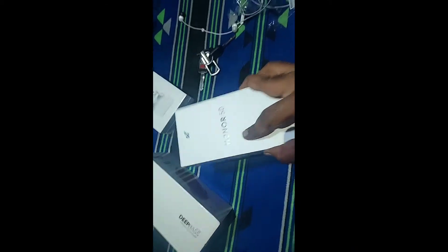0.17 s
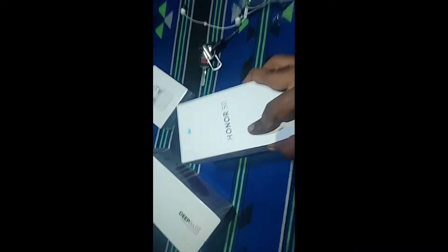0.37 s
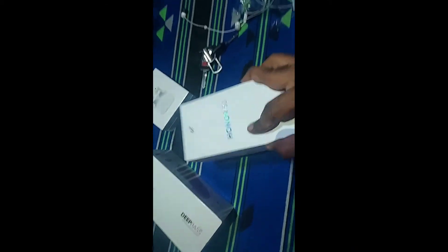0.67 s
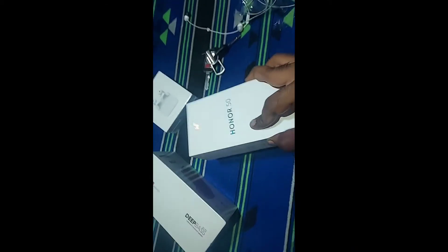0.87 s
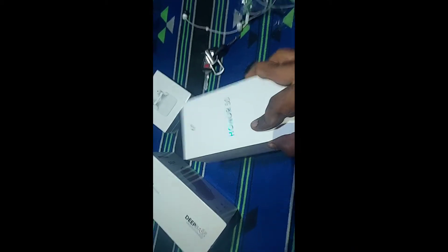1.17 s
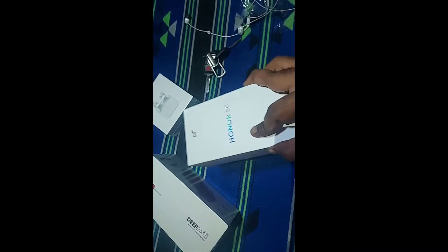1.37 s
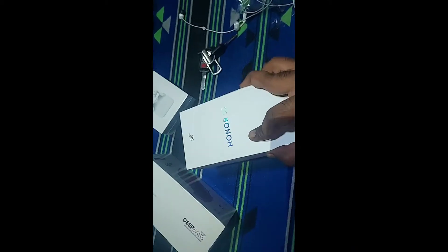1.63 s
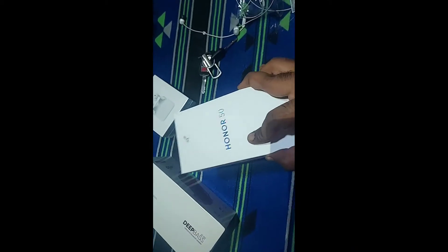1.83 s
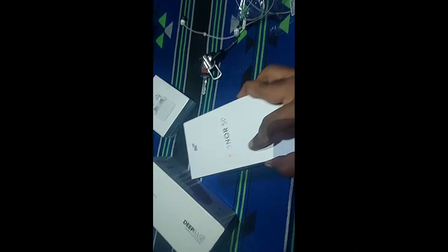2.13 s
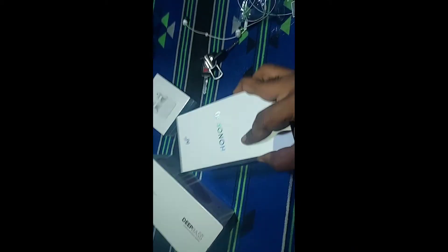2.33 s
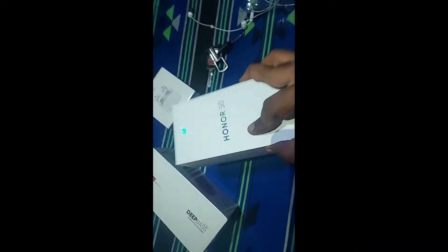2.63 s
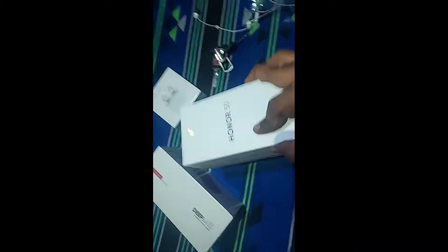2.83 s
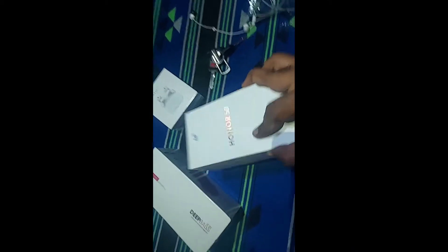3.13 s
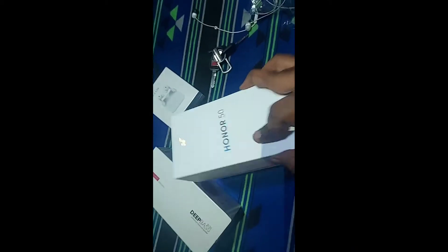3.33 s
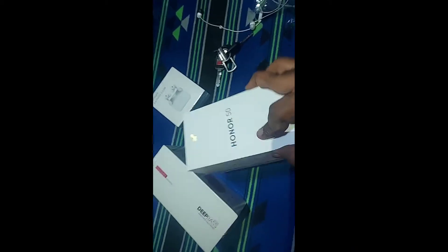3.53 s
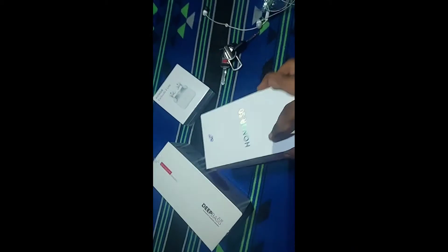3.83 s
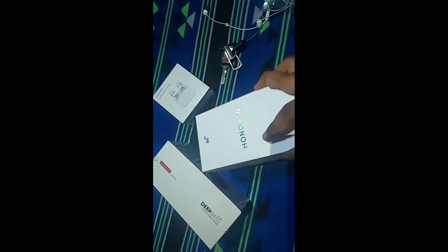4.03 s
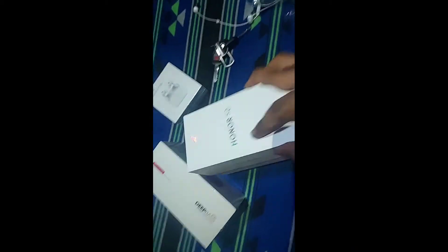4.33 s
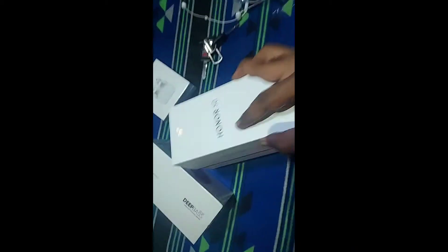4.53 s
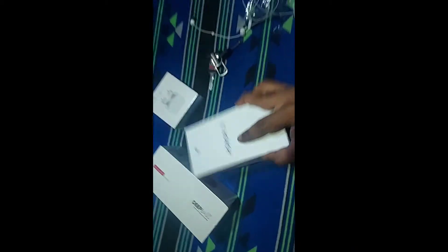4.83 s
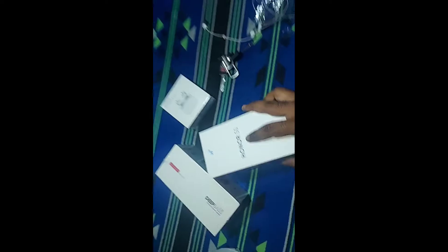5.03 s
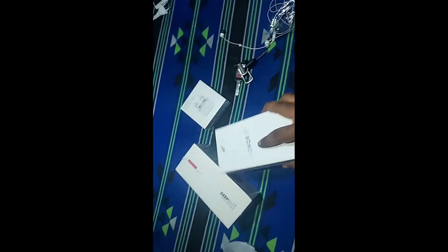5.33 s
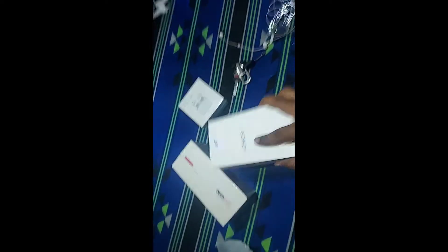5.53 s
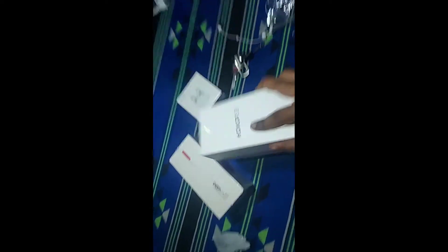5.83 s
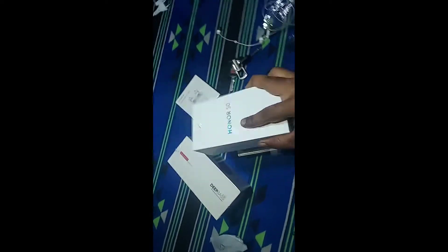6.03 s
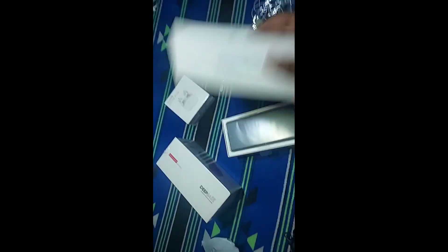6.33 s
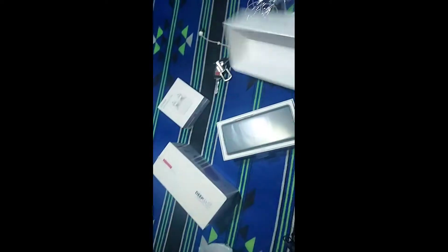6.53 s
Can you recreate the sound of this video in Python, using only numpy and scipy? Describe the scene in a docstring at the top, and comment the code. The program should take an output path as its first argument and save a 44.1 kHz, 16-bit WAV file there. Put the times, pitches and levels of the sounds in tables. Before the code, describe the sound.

A stiff cardboard box is shaken by hand, hollow knocks and light edge taps quickening over papery rasping until the lid scrapes free.

```python
"""In a quiet, soft room a hand shakes a stiff cardboard box to work its tight lid off, close to two ports.
The contents knock: short blows ring the hollow box. Edges tap: paired contacts ring small panels.
Lid and tray rasp: dense random contacts ring the same box under a grainy hiss, until the lid scrapes free.
The freed lid brushes cloth; faint hum, low rumble and airy hiss lie below."""
import sys
import numpy as np
from scipy import signal
from scipy.fft import rfft, irfft, next_fast_len
from scipy.io import wavfile

SR = 44100
rng = np.random.default_rng(int(sys.argv[2]) if len(sys.argv) > 2 else 0)


def int16_out(signal):
    """Quantize to a 16-bit WAV file."""
    q = np.round(np.clip(np.atleast_2d(signal).T, -1, 1) * 32767)
    wavfile.write(sys.argv[1], SR, q.astype(np.int16))


N = 295105

# Contents knocking on the walls. Each row: time in seconds, relative level in dB, centre of the ring in Hz.
THUMP_EVENTS = [(0.046, -23, 298), (0.095, -16, 250), (0.106, -20, 257), (0.265, -54, 328),
                (0.314, -20, 330), (0.327, -7.5, 287), (0.404, -37, 404), (0.49, -19, 305),
                (0.514, -12, 380), (0.525, -17.5, 328), (0.553, -27, 310), (0.578, -30.5, 400),
                (0.658, -9.5, 290), (0.697, -2.5, 296), (0.745, -22, 333), (0.788, -27, 423),
                (0.852, -10.5, 394), (0.905, -20, 367), (0.954, -29.5, 352), (1.009, -15.5, 396),
                (1.046, -30.5, 398), (1.129, -25.5, 437), (1.172, -29.5, 406), (1.241, -23.5, 432),
                (1.283, -20.5, 410), (1.328, -24, 318), (1.353, -21, 328), (1.379, -12, 360),
                (1.404, -21, 390), (1.444, -31.5, 358), (1.525, -27, 430), (1.635, -25.5, 436),
                (1.708, -26, 414), (1.782, -36.5, 380), (2.095, -31.5, 390), (2.223, -42, 340),
                (2.322, -27.5, 380), (2.344, -22, 310), (2.414, -1, 312), (2.491, -25.5, 366),
                (2.606, -9.5, 313), (2.649, -32, 410), (2.674, -20, 397), (2.797, -6, 443),
                (2.838, -18.5, 330), (2.856, -28.5, 360), (2.932, -14.5, 470), (2.981, 2, 402),
                (3.039, -16.5, 362), (3.071, -13, 414), (3.122, -23.5, 380), (3.143, -15, 380),
                (3.155, -3.5, 392), (3.227, -22.5, 380), (3.253, -15.5, 350), (3.283, -18, 390),
                (3.343, -10, 368), (3.393, -22, 366), (3.409, -22, 385), (3.431, -16.5, 423),
                (3.497, -4, 384), (3.569, -25.5, 380), (3.596, -16, 350), (3.604, -15.5, 410),
                (3.686, -9, 374), (3.757, -24.5, 400), (3.838, -23, 434), (3.856, -27, 363),
                (3.884, -17.5, 388), (3.893, -13.5, 407), (3.966, -21.5, 390), (4.066, -20.5, 380),
                (4.096, -1.5, 380), (4.153, -24, 380), (4.176, -12, 440), (4.195, -35, 350),
                (4.204, -17, 450), (4.265, -17.5, 390), (4.278, 2, 410), (4.293, -11.5, 330),
                (4.392, -14, 420), (4.477, -6, 440), (4.555, -27, 382), (4.611, -17, 408),
                (4.688, -10.5, 344), (4.762, -26.5, 380), (4.818, -17, 409), (4.901, -25, 345),
                (4.913, -13, 400), (4.943, -16, 343), (4.984, -28, 320), (5.478, -32.5, 370),
                (5.498, -33.5, 383), (5.572, -15, 450), (5.644, -26, 380), (5.688, -14, 460),
                (5.758, -1, 416), (5.763, -1.5, 448), (5.772, -8.5, 308), (5.786, -11, 375),
                (5.803, -10.5, 417), (5.828, -37.5, 390), (5.862, -17, 398), (5.873, -5.5, 322.5),
                (5.943, -11, 400), (5.952, -1.5, 390), (5.962, -25, 380), (6.003, -22, 390),
                (6.021, -1.5, 410), (6.046, -26, 452), (6.052, 0.5, 430), (6.061, -3, 470),
                (6.12, -10.5, 365), (6.14, -13, 390), (6.169, -24, 278)]
# Edges tapping and slipping. Each row: time in seconds, relative ring level in dB, centre of the ring in Hz,
# relative level of the papery puff in dB.
TAP_EVENTS = [(0.046, -28.5, 1900, -47), (0.106, -37, 1250, -59.5), (0.264, -58, 1700, -91),
              (0.306, -34.5, 1490, -83), (0.313, -36, 1015, -56), (0.328, -33, 960, -52),
              (0.404, -41.5, 1590, -83), (0.491, -29, 1460, -52.5), (0.513, -35, 970, -57),
              (0.548, -35, 900, -59), (0.58, -37, 1560, -79), (0.659, -19, 1800, -37.5),
              (0.695, -20, 950, -40), (0.733, -27.5, 1120, -53.5), (0.747, -35, 1235, -73.5),
              (0.77, -47, 1890, -71), (0.79, -35, 1560, -78), (0.851, -25, 935, -49.5),
              (0.899, -31, 1010, -56), (0.906, -35, 1250, -69), (1.007, -21, 940, -46),
              (1.045, -41, 1290, -71), (1.131, -30, 980, -54), (1.172, -42.5, 1240, -76),
              (1.243, -29, 1100, -56), (1.284, -36.5, 1300, -53), (1.327, -32, 1690, -49.5),
              (1.356, -37, 1256, -53), (1.382, -18, 935, -44.5), (1.431, -50, 2000, -65),
              (1.527, -44, 1750, -68), (1.636, -45, 1060, -68), (1.708, -34, 1110, -58),
              (1.783, -51, 1240, -97), (1.831, -72, 1540, -66), (2.094, -45.5, 1240, -75),
              (2.145, -56.5, 1490, -87), (2.226, -56, 1500, -80), (2.324, -41, 1280, -76),
              (2.413, -22, 1140, -45.5), (2.491, -36, 1190, -76), (2.601, -26.5, 1000, -52),
              (2.628, -41, 1170, -69), (2.676, -28.5, 1220, -68), (2.759, -30, 1180, -47.5),
              (2.784, -35, 1180, -61), (2.8, -17, 1050, -49), (2.856, -28.5, 1245, -68),
              (2.919, -39, 1270, -56.5), (2.932, -27.5, 1513, -49.5), (2.944, -43.5, 1364, -50.5),
              (2.979, -16.5, 1127, -44.5), (3.024, -47.5, 1114, -55), (3.041, -30, 1208, -58),
              (3.074, -16.5, 1530, -36), (3.122, -28, 1150, -45.5), (3.153, -14, 1060, -44),
              (3.166, -52, 1260, -55), (3.216, -37, 1030, -71), (3.255, -33, 1260, -52),
              (3.284, -30, 1220, -61), (3.344, -16, 1120, -45), (3.393, -28.5, 1223, -71),
              (3.411, -43.5, 1554, -60.5), (3.432, -24, 1542, -45), (3.498, -19.5, 1283, -52),
              (3.509, -30.5, 1250, -44.5), (3.57, -33, 1230, -55), (3.595, -35, 1520, -44),
              (3.606, -15.5, 1240, -60), (3.673, -33, 1370, -52), (3.688, -19, 1260, -41),
              (3.708, -17, 1100, -43.5), (3.756, -40, 1110, -74), (3.789, -43.5, 1780, -64),
              (3.837, -36, 1210, -57), (3.854, -27.5, 1000, -48), (3.879, -35, 980, -68),
              (3.886, -28, 1210, -47), (3.895, -20.5, 1290, -56), (3.967, -31.5, 1200, -68),
              (4.065, -35, 1460, -67.5), (4.088, -29, 1248, -42), (4.097, -17, 1370, -47.5),
              (4.155, -29.5, 1270, -68.5), (4.175, -39, 1280, -55.5), (4.203, -22.5, 1520, -46.5),
              (4.241, -24, 1271, -42.5), (4.249, -39, 1177, -54), (4.275, -20.5, 1328, -42.5),
              (4.294, -19, 1423, -40), (4.346, -36, 1072, -49), (4.382, -38, 1710, -48.5),
              (4.394, -20, 1600, -54), (4.479, -18.5, 1293, -47.5), (4.496, -28.5, 1110, -55),
              (4.553, -41.5, 1570, -66), (4.613, -33.5, 1570, -70), (4.679, -35.5, 1187, -69),
              (4.689, -25.5, 1560, -50), (4.763, -32.5, 1550, -77), (4.792, -53, 2240, -64),
              (4.82, -29, 1650, -59), (4.914, -26.5, 1240, -64), (4.93, -47, 1050, -68),
              (4.942, -33, 1530, -44.5), (5.06, -73, 1900, -65), (5.479, -54.5, 1420, -77),
              (5.498, -51, 1010, -89), (5.572, -27.5, 1520, -49.5), (5.646, -35.5, 1510, -69),
              (5.671, -44.5, 1910, -79), (5.689, -25, 1117, -51.5), (5.726, -40, 1632, -58.5),
              (5.759, -19.5, 1355, -37), (5.776, -17.5, 1613, -41), (5.792, -26, 1245, -42),
              (5.804, -24, 1140, -41), (5.862, -28, 1300, -48.5), (5.871, -19.5, 1396, -36),
              (5.944, -24, 1093, -39.5), (5.957, -13.5, 1004, -48), (5.966, -20, 1202, -58.5),
              (6.0, -38.5, 1100, -51), (6.02, -13.5, 1135, -22), (6.046, -20, 1542, -30),
              (6.052, -19, 1700, -20.5), (6.063, -16, 1670, -32.5), (6.076, -31.5, 1700, -45.5),
              (6.125, -20, 1700, -28.5), (6.14, -27.5, 1893, -28), (6.151, -52, 1800, -49),
              (6.585, -60.5, 1101, -62.5)]
# Lid rubbing on tray. Each row: time in seconds, relative rub on the box in dB, relative papery hiss in dB.
RUB_CURVE = [(0.0, -55, -74), (0.32, -59.5, -79), (0.73, -46, -66), (1.38, -55, -73.5), (2.1, -71.5, -81),
             (2.61, -44, -65), (2.98, -40, -58), (3.24, -44, -63), (3.91, -50.5, -67), (4.21, -41, -59),
             (4.9, -57, -69.5), (5.09, -76, -76.5), (5.52, -62.5, -75), (5.72, -42, -63.5),
             (5.92, -39.5, -60.5), (6.02, -36, -65.5), (6.24, -92.5, -81), (6.69, -84, -78)]
# Air and walls of the box. Each row: frequency in Hz, relative level in dB, t60 in seconds, left over right in dB.
HOLLOW_MODES = [(170.6, 8.5, 0.14, 6.5), (247.8, 15, 0.041, -2), (296.6, -3.5, 0.062, 1.5),
                (369.6, 4.5, 0.013, -0.5), (453.3, 3.5, 0.02, -1), (533, -1, 0.032, 5),
                (674, 8.5, 0.03, -2.5), (730, 8, 0.011, 0)]
# Small panels and edges. Each row: frequency in Hz, relative level in dB, t60 in seconds, left over right in dB.
PANEL_MODES = [(835, 9, 0.014, 8.5), (1022, 4.5, 0.014, -1.5), (1198, 8, 0.017, -1.5),
               (1633, 2, 0.021, -10.5), (1758, 0.5, 0.027, -9.5), (1910, -1.5, 0.032, -2),
               (2400, -17, 0.023, -1), (2660, -23, 0.036, -3), (3427, -30.5, 0.021, 6.5),
               (4730, -25, 0.017, -12.5)]


def from_db(db):
    """Decibels to gain."""
    return 10 ** (np.asarray(db) / 20)


def rms_one(x):
    """Scale to rms 1."""
    return x / np.sqrt(np.mean(x ** 2) + 1e-20)


def in_time(rows):
    """Columns of a curve table, interpolated to one value a sample."""
    s, *columns = np.transpose(rows)
    return [np.interp(np.arange(N) / SR, s, c) for c in columns]


def smooth(x, hz):
    """Double one-pole low-pass."""
    r = np.exp(-2 * np.pi * hz / SR)
    return signal.lfilter([(1 - r) ** 2], [1, -2 * r, r * r], x + 1e-18)


def drift(hz):
    """Low-passed noise of rms 1; the first second, where the filter settles, is dropped."""
    return rms_one(smooth(rng.standard_normal(N + SR), hz)[SR:])


def sides(db):
    """Left and right gains for a left-over-right level step."""
    return from_db(np.array([db, -np.asarray(db)]) / 2)


def around(s, db, early_s, long_s):
    """A smooth bump of the given height for each event, starting a little before it."""
    marks = np.zeros(N)
    starts = np.maximum(np.round((s - early_s) * SR).astype(int), 0)
    np.add.at(marks, starts, from_db(db))
    return signal.oaconvolve(marks, np.hanning(round(long_s * SR)))[:N]


def coloured(spectrum, alike, grain_db=0.):
    """Stereo noise, rms 1: alike is the share common to both ports, grain makes that share crackle."""
    hz, db = np.transpose(spectrum)
    grid_hz = np.maximum(np.arange(N // 2 + 1) * SR / N, 1)
    mid, side = rng.standard_normal((2, N))
    mid = rms_one(mid * from_db(grain_db * drift(hz=905)))
    share = np.clip(alike, 0, 1)
    pair = np.sqrt(1 + share) * mid + np.sqrt(1 - share) * side * [[1], [-1]]
    shape = from_db(np.interp(np.log(grid_hz), np.log(hz), db))
    return rms_one(irfft(rfft(pair) * shape, N))


def ring(clicks, hz, t60):
    """Damped resonance: a unit click sets a sine of starting height 1 ringing."""
    r, w = from_db(-60 / (t60 * SR)), 2 * np.pi * hz / SR
    return signal.lfilter([0, np.sin(w)], [1, -2 * r * np.cos(w), r * r], clicks + 1e-18)


def strike(modes, at, gains, centre_hz, focus_db, spread_db, apart_db):
    """Each contact favours modes near its centre, varied by chance and not quite alike at both ports."""
    hz, level_db, t60, side_db = np.transpose(modes)
    chance = rng.standard_normal((len(at), len(modes), 2))
    octaves = np.log2(hz / np.reshape(centre_hz, (-1, 1)))
    share = from_db(level_db - focus_db * octaves ** 2 + spread_db * chance[..., 0])
    share = share / np.linalg.norm(share, axis=1, keepdims=True)
    out = np.zeros((2, N))
    for k in range(len(modes)):
        clicks = np.zeros((2, N))
        port_gains = sides(side_db[k] + apart_db * chance[:, k, 1])
        np.add.at(clicks, (slice(None), at), gains * share[:, k] * port_gains)
        out += ring(clicks, hz[k], t60[k])
    return out


def through_air(x, hz, t60):
    """Enclosed air: a wide resonance, twice, that swells gradually and radiates no steady push."""
    moving = np.diff(x, prepend=0) * SR / (2 * np.pi * hz)
    return ring(ring(moving, hz, t60), hz, t60) * (2 * np.log(1000) / (t60 * SR)) ** 2


def air():
    """Patchy room hiss with a faint airy tone: noise through a narrow resonance."""
    # Hiss spectrum. Each row: frequency in Hz, relative density in dB per Hz.
    hiss_spectrum = [(71, -35), (120, 8.5), (378, -4.5), (1050, -22), (1750, -20), (3310, -44),
                     (7200, -14.5), (7980, -17), (10600, -19.5), (16000, -17)]
    # Airy tone. Frequency in Hz, width in Hz, base level in dB.
    whine = (1790, 82, -82.5)
    # Change of the tone, lower towards the end. Each row: time in seconds, added level in dB.
    whine_fade = [(0, 3), (5.4, -3.5), (6.2, -15.5), (6.69, -10)]
    hz, width_hz, db = whine
    band = rms_one(ring(rng.standard_normal((2, N)), hz, np.log(1000) / (np.pi * width_hz)))
    hiss = from_db(-75 + 2.0 * drift(hz=8)) * coloured(hiss_spectrum, alike=0.41)
    band_db = db + in_time(whine_fade)[0] + 2.5 * drift(hz=4)
    return hiss + from_db(band_db) * band


def hum():
    """Two low sine lines with slightly wandering phase, swelling and fading together."""
    # Hum lines. Each row: frequency in Hz, relative level in dB.
    lines = [(102, 1.5), (51.5, -4)]
    # Swell of the hum. Each row: time in seconds, level in dB.
    level = [(0.0, -59.5), (.8, -56), (1.2, -69), (2.3, -78), (2.9, -64), (4.3, -45.5), (4.9, -54.5),
             (5.4, -59), (6.1, -57), (6.3, -74), (6.69, -71)]
    t = np.arange(N) / SR
    tone = sum(from_db(db) * np.sin(2 * np.pi * (hz * t + 0.1 * drift(hz=1))) for hz, db in lines)
    return from_db(in_time(level)[0]) * tone


def sway():
    """Lumpy low rumble as the box swings: noise that follows the rub, the thumps and the jolts."""
    # Bumps of the hand or box. Each row: time in seconds, level in dB.
    jolts = [(.8, -49), (1.399, -64), (4.95, -48), (5.08, -50), (6.68, -55)]
    thump_s, thump_db, _ = np.transpose(THUMP_EVENTS)
    jolt_s, jolt_db = np.transpose(jolts)
    swing = from_db(-62.0 + 0.72 * (in_time(RUB_CURVE)[0] + 49.5))
    swing = swing + around(thump_s, -44.0 + 0.63 * thump_db, early_s=0.035, long_s=.16)
    swing = swing + around(jolt_s, jolt_db, early_s=0.082, long_s=.2)
    # Each row: frequency in Hz, relative density in dB per Hz.
    spectrum = [(15, 5.5), (35, -16.5), (55, -17.5), (85, -0.5), (140, -23.0), (300, -55.0)]
    return swing * coloured(spectrum, alike=0.99)


def rustle():
    """The freed lid brushing past cloth: thin, bright, patchy noise."""
    # Swell of the brush. Each row: time in seconds, level in dB.
    level = [(6.3, -120), (6.52, -100), (6.55, -63), (6.62, -67), (6.69, -68)]
    # Cloth spectrum. Each row: frequency in Hz, relative density in dB per Hz.
    cloth = [(880, -44), (1500, -24.5), (2910, -7.5), (3350, -17), (4870, -7), (11800, -4), (16000, -10.5)]
    patchy_db = in_time(level)[0] + 2.0 * drift(hz=30.06)
    return from_db(patchy_db) * coloured(cloth, alike=0.18, grain_db=0.5)


def room(x):
    """Six feedback delays a side, duller on every round as the walls absorb treble."""
    t60_s, wall_cut_hz = 0.22, 4300
    size = next_fast_len(N + SR)
    w = 2 * np.pi * np.arange(size // 2 + 1) / size
    dull = 1 / (1 + 1j * w * SR / (2 * np.pi * wall_cut_hz))
    out = np.zeros((2, len(w)), complex)
    for k, lag_s in enumerate(rng.uniform(0.0073, 0.022, 12)):
        loop = from_db(-60 * lag_s / t60_s) * dull * np.exp(-1j * w * lag_s * SR)
        out[k % 2] += (-1) ** (k // 2) * loop / (1 - loop)
    return irfft(out * rfft(x, size), size)[:, :N]


def scrapes():
    """Long scrapes of lid along tray: smooth swells for the rumble and the hiss."""
    # Each row: start in seconds, length in seconds, relative rumble in dB, relative hiss in dB.
    strokes = [(2.746, .1, -37, -58), (3.143, 0.14, -48, -75), (4.226, 0.11, -30.5, -60),
               (4.879, 0.12, -39, -67), (4.951, 0.15, -54.5, -78), (5.702, .1, -32, -61),
               (5.909, 0.11, -29, -53), (5.971, 0.14, -39, -43.5), (6.103, 0.16, -59.5, -64.5)]
    out = np.zeros((2, N))
    for s, length_s, *levels_db in strokes:
        bump = np.hanning(round(length_s * SR))
        start = round(s * SR)
        out[:, start:start + len(bump)] += from_db(levels_db)[:, None] * bump
    return out


def rub(per_s):
    """Fibres catch and slip: dense uneven contacts into the box and a grainy hiss, swelling around each blow."""
    # Papery hiss spectrum. Each row: frequency in Hz, relative density in dB per Hz.
    paper_spectrum = [(1470, -16.5), (2500, -13), (3060, -20.5), (3490, -20), (5070, -20), (6150, -27),
                      (9730, -27), (14700, -31), (15500, -27), (16000, -41)]
    # Hiss above 7 kHz, brighter as the lid works loose. Each row: time in seconds, treble change in dB.
    brightness = [(0.0, -21), (1.6, -16), (2.4, 1.5), (4.8, -2), (5.1, 4.5), (5.9, -2), (6.05, 3.5),
                  (6.69, 1)]
    rub_db, hiss_db = in_time(RUB_CURVE)
    bright_db, = in_time(brightness)
    scrape, scrape_hiss = scrapes()
    thump_s, thump_db, _ = np.transpose(THUMP_EVENTS)
    tap_s, tap_db, _, puff_db = np.transpose(TAP_EVENTS)

    # the lid slides around each thump and moves less between
    strokes = around(thump_s, 0 * thump_db, early_s=.025, long_s=0.064)
    sliding = np.minimum(from_db(-5.5) + strokes, 1.5)
    rubbing = from_db(rub_db) * sliding + scrape
    rumble = from_db(-0.5) * rubbing + around(thump_s, thump_db - 26, early_s=.014, long_s=.044)
    steady_rasp = from_db(-41.5) * (rubbing / from_db(-27.5)) ** 0.93
    rasp = steady_rasp + around(tap_s, tap_db - 22, early_s=.003, long_s=0.022)
    snaps = around(tap_s, puff_db - 2.5, early_s=0.00033, long_s=0.0058)
    puffs = around(tap_s, puff_db - 11, early_s=0.01, long_s=0.033)
    hiss = from_db(hiss_db) * sliding + scrape_hiss + snaps + puffs

    at = np.flatnonzero(rng.random(N) < per_s * from_db(3.0 * drift(hz=25)) / SR)
    sizes = from_db(4 * np.minimum(rng.exponential(1, len(at)), 3))
    sizes = sizes * rng.choice([-1, 1], len(at))
    hollow = strike(HOLLOW_MODES, at, sizes, centre_hz=393.3, focus_db=4.5, spread_db=8.0, apart_db=-3.0)
    hollow = rms_one(through_air(hollow, hz=398, t60=0.011))
    panels = rms_one(strike(PANEL_MODES, at, sizes, centre_hz=1500, focus_db=8, spread_db=7, apart_db=7))

    paper = coloured(paper_spectrum, alike=.35, grain_db=4)
    top = signal.sosfilt(signal.butter(2, 7000, "high", fs=SR, output="sos"), paper)
    paper = paper + (from_db(bright_db) - 1) * top
    paper = from_db(2.0 * drift(hz=59.6)) * paper * sides(-0.83)[:, None]
    return rumble * hollow + rasp * panels + hiss * paper


def taps():
    """Edges tap and slip: each tap is a ragged pair of contacts ringing the panels."""
    s, level_db, centre_hz, _ = np.transpose(TAP_EVENTS)
    at = np.round(s * SR).astype(int)
    chance = rng.random((len(s), 3))
    first = np.sign(chance[:, 0] - .5) * from_db(level_db - 1.5)
    second = .7 * first * np.sign(chance[:, 2] - .5)
    late = at + (0.0025 * SR * chance[:, 1]).astype(int)   # up to 2.5 ms later
    rings = strike(PANEL_MODES, np.r_[at, late], np.r_[first, second], np.r_[centre_hz, centre_hz],
                   focus_db=20, spread_db=6.5, apart_db=3)
    return smooth(rings, hz=4300)


def thumps():
    """Contents blow softly into the hollow: walls ring through the enclosed air and the whole box swings."""
    # Swing of the whole box. Frequency in Hz, relative level in dB, t60 in seconds.
    belly = (116, -21, 0.086)
    s, level_db, centre_hz = np.transpose(THUMP_EVENTS)
    at = np.round(s * SR).astype(int)
    gains = rng.choice([-1, 1], len(s)) * from_db(level_db)
    walls = strike(HOLLOW_MODES, at, 1.3 * gains, centre_hz, focus_db=20.0, spread_db=2, apart_db=1)
    hz, db, t60 = belly
    pushes = np.zeros(N)
    np.add.at(pushes, at, gains)
    whole_box = from_db(db) * ring(smooth(pushes, hz=224), hz, t60)
    return through_air(walls, hz=422.3, t60=0.011) + whole_box


def scene():
    """Box, room and background; the direct box sound reaches the right port one sample later."""
    port_lag_s, room_db = 1 / SR, -26
    box = thumps() + taps() + rub(per_s=350)
    left, right = box
    right = np.interp(np.arange(N) - port_lag_s * SR, np.arange(N), right)
    background = hum() + sway() + rustle() + air()
    return np.array([left, right]) + from_db(room_db) * room(box.mean(axis=0)) + background


def record(dry):
    """The microphone loses the deepest bass, the highest peaks are rounded, the top is cut steeply."""
    ceiling, cutoff_hz = .85, 16500
    thin = signal.sosfilt(signal.butter(4, 42, "high", fs=SR, output="sos"), dry)
    rounded = thin / (1 + np.abs(thin / ceiling) ** 4) ** (1 / 4)
    return signal.sosfilt(signal.cheby2(14, 70, cutoff_hz, fs=SR, output="sos"), rounded)


dry = scene()
out = record(dry)
int16_out(out)
```